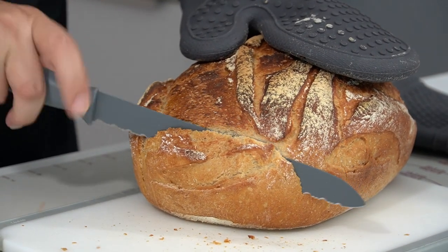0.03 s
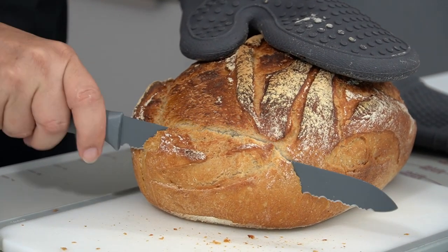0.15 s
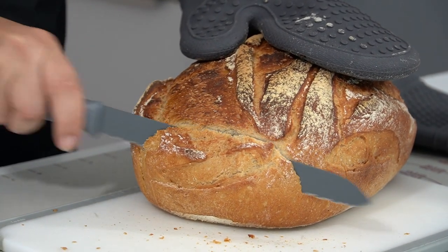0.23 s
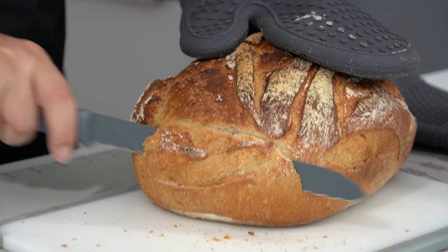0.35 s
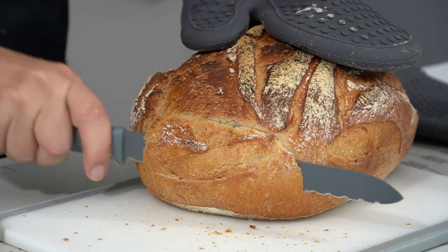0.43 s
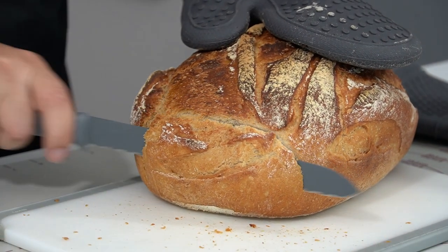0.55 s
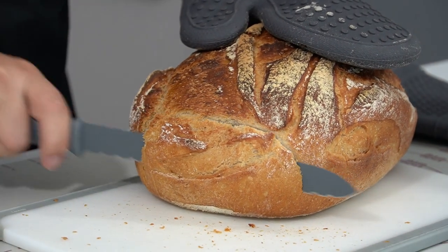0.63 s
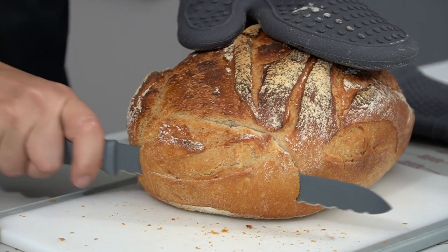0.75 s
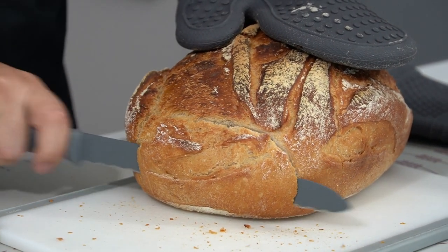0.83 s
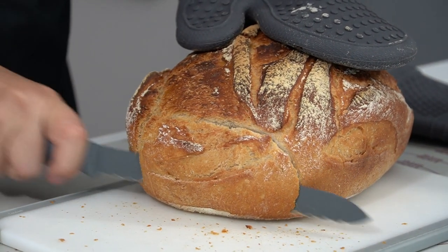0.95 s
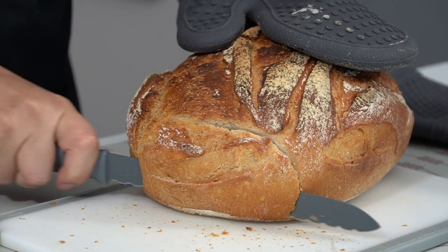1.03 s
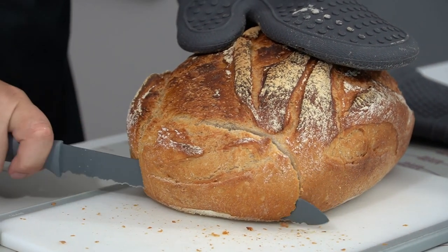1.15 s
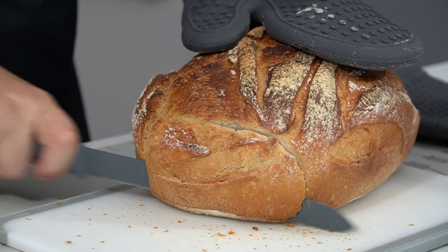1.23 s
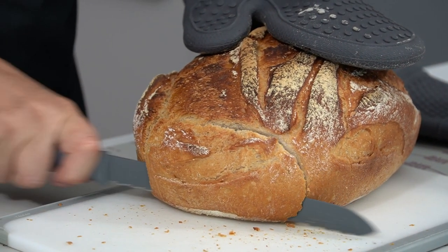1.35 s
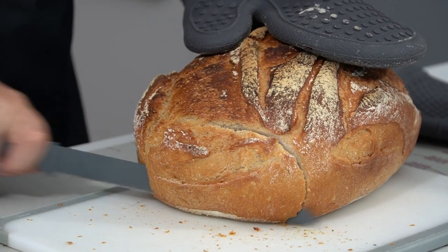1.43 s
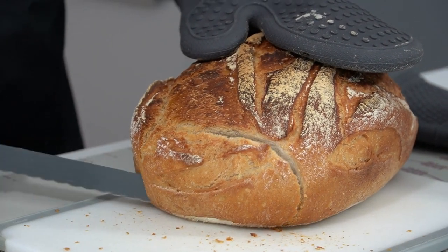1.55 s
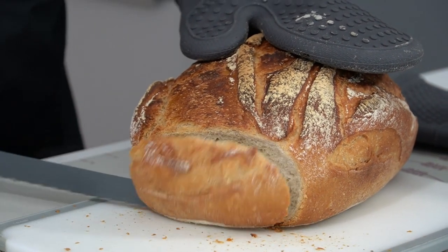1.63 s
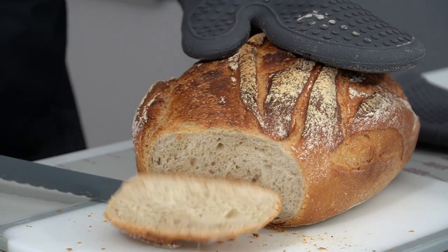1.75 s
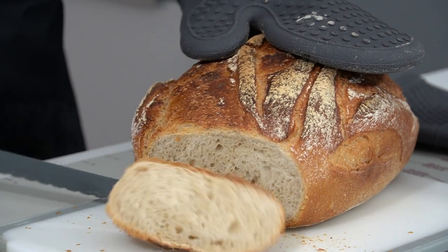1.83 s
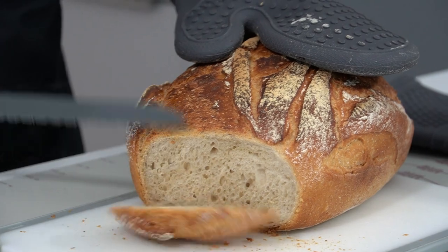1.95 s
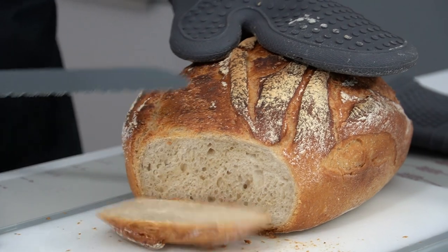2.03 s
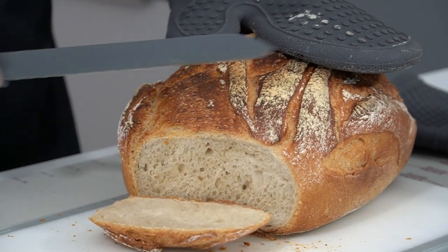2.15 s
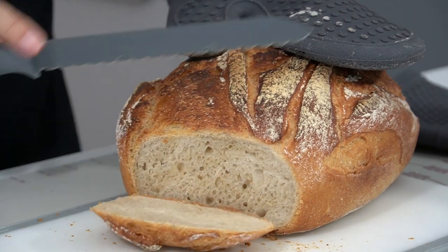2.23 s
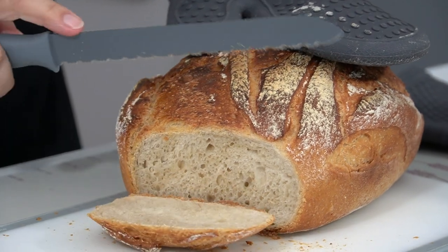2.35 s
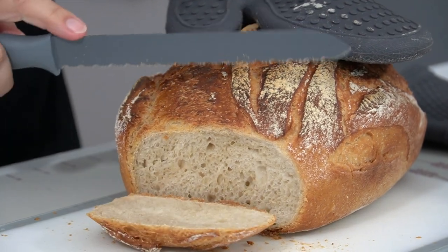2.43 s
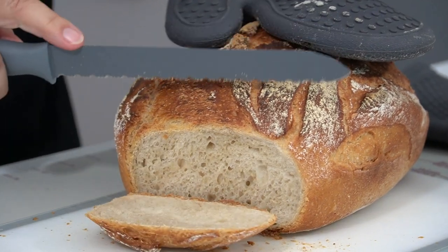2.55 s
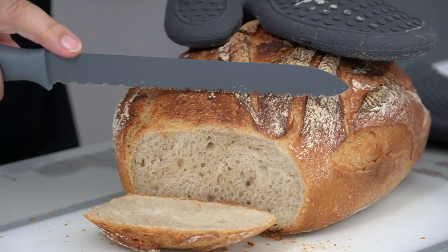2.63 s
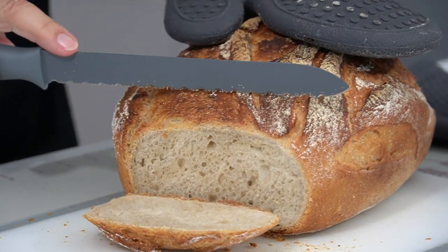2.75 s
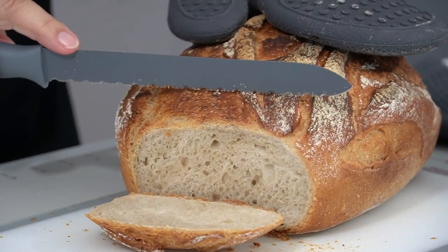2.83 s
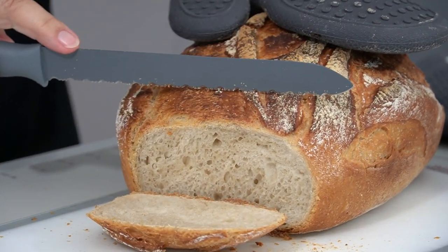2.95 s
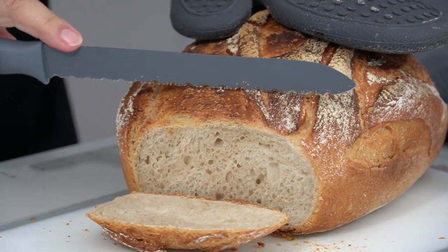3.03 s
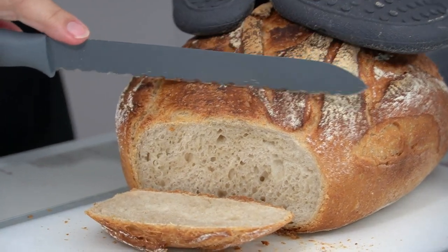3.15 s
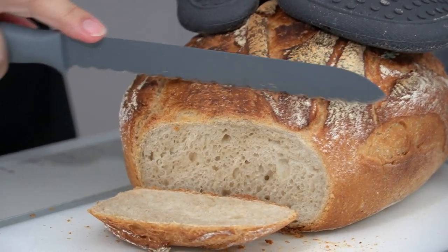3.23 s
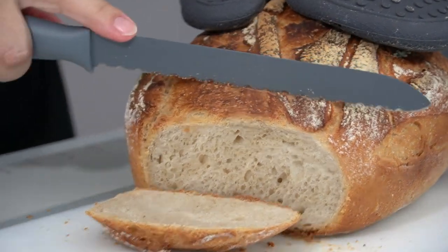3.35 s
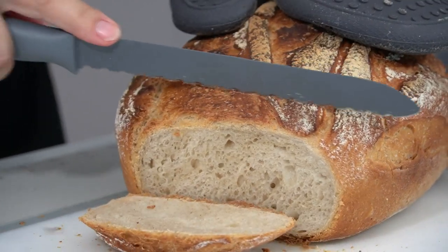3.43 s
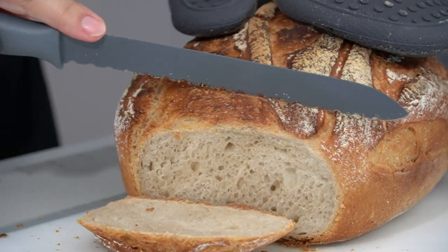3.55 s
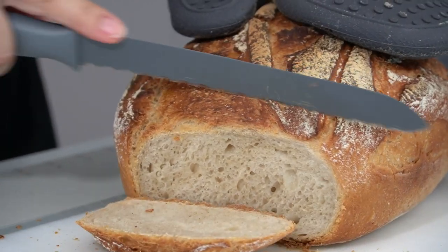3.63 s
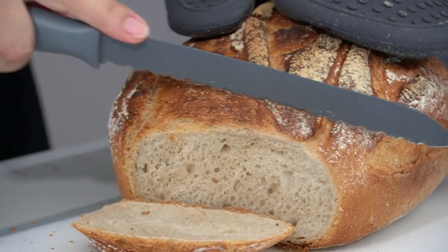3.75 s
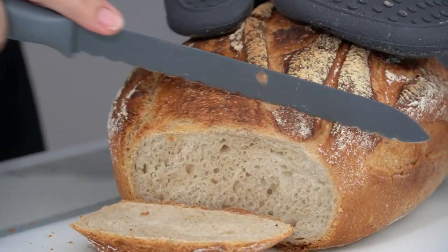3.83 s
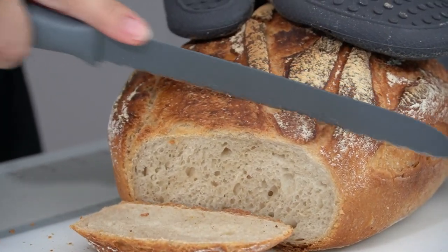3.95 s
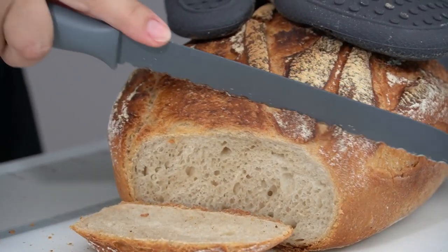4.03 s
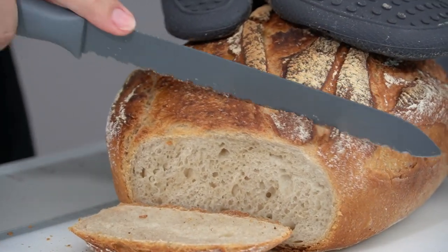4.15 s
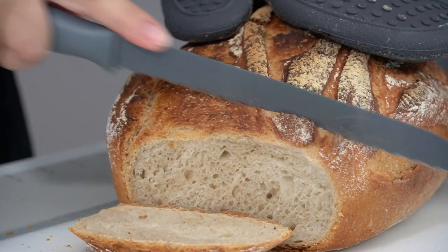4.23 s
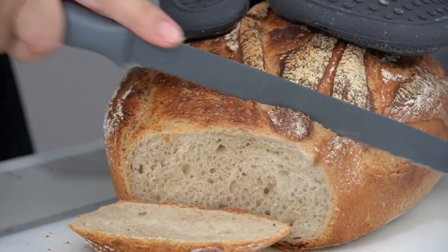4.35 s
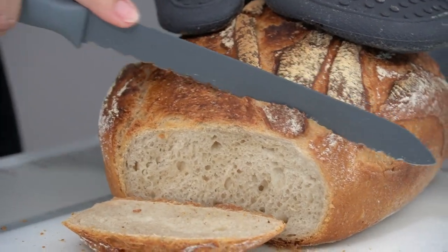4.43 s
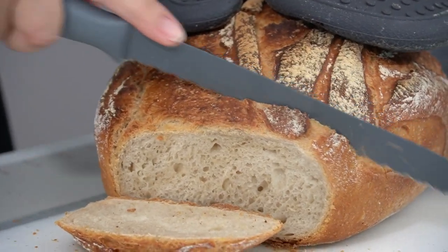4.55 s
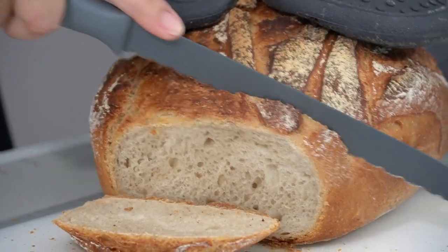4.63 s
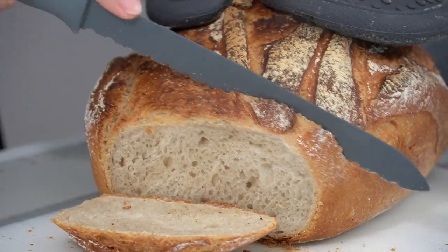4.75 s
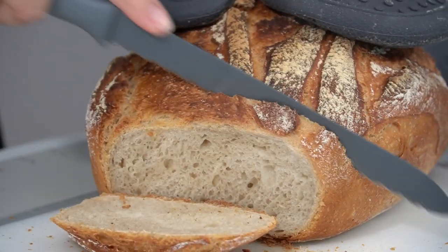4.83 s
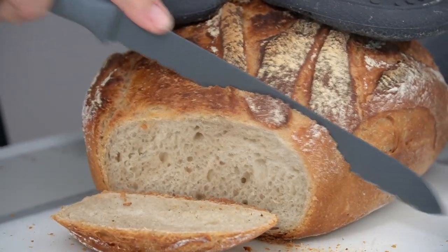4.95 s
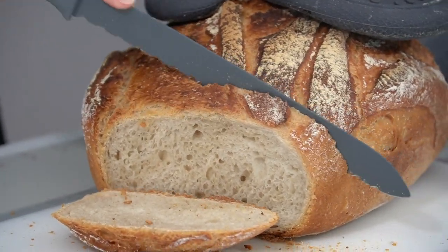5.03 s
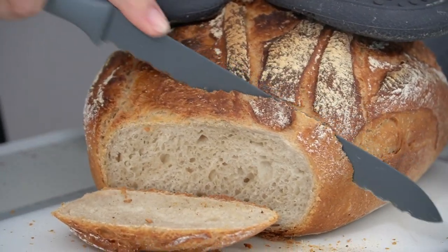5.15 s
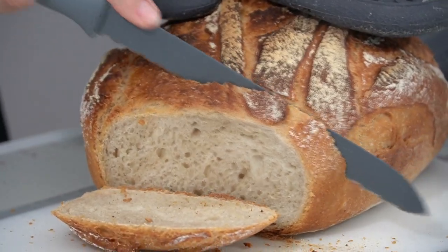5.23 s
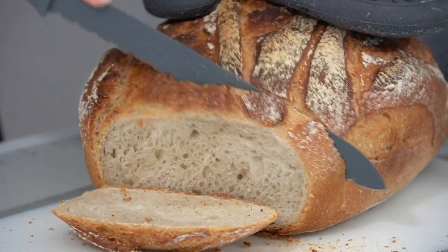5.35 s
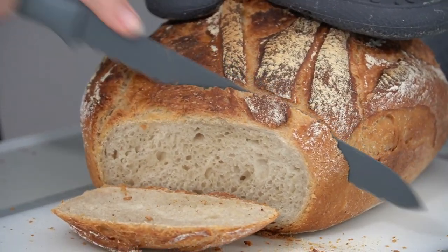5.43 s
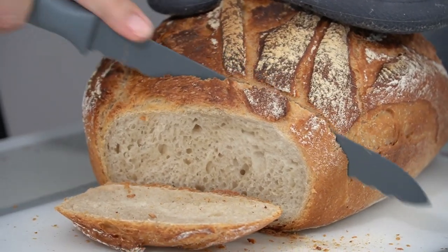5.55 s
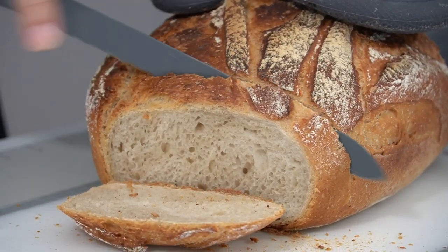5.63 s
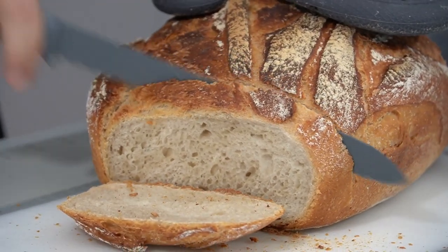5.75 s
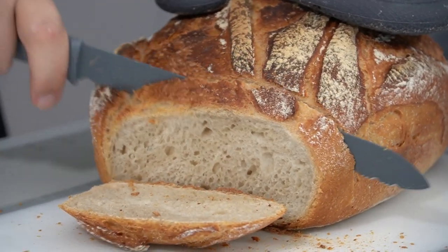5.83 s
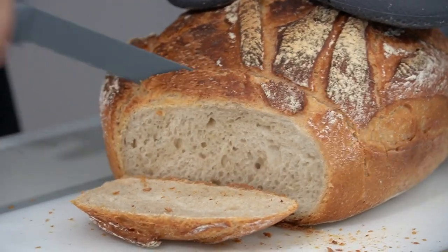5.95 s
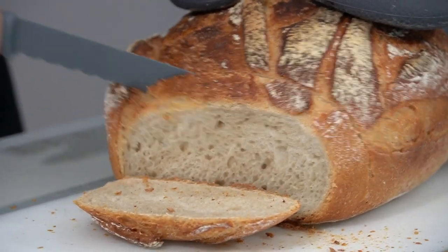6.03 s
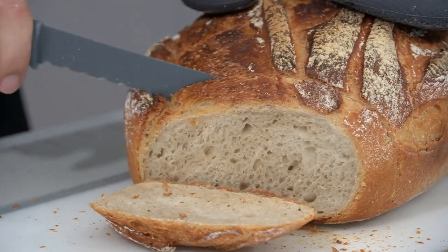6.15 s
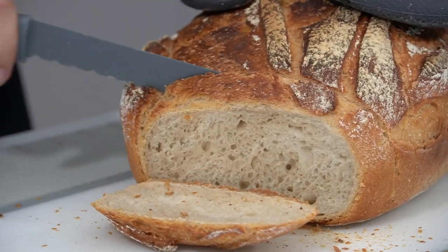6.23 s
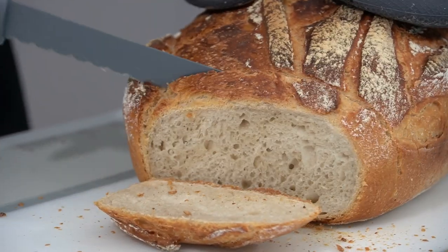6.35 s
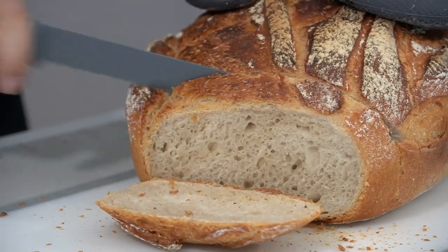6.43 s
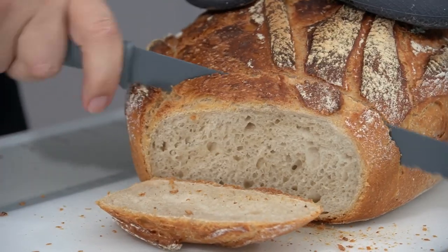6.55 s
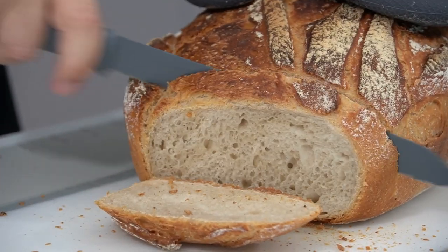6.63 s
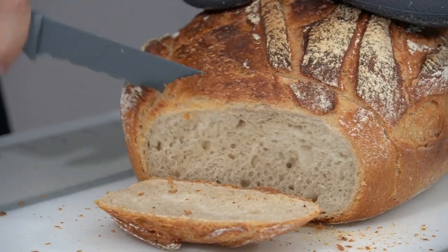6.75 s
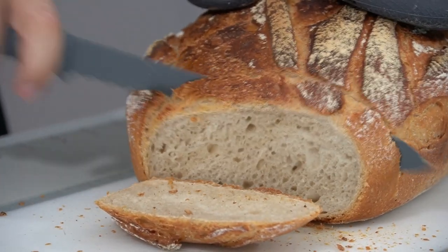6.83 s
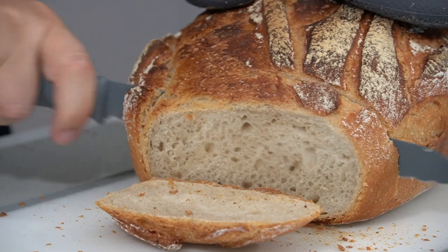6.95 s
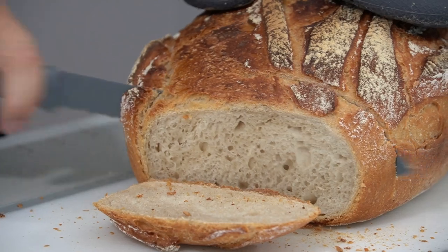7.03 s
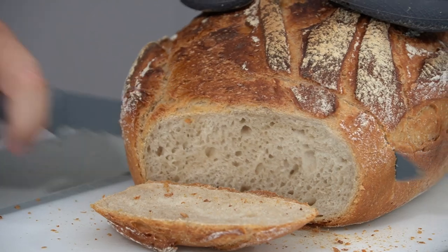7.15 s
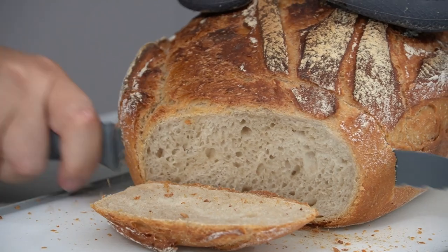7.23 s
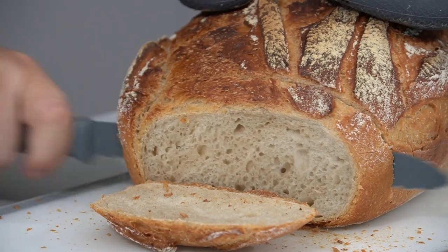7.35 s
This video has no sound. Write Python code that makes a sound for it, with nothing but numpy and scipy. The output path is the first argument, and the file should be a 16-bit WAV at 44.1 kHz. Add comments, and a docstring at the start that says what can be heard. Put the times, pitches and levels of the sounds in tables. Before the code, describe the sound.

Crisp crust crackles and snaps under quick back-and-forth knife strokes, a slice thuds onto a board, and after a pause sawing resumes with short groans.

```python
"""A serrated knife saws through a hot crusty loaf on a board: many tiny fractures crack, sparkle and thump the loaf.
Larger snaps are single cracks with a push on the loaf; on moist crumb or hard crust the blade sticks and slips.
One slice peels off, falls and rocks with dull thuds made by impulses into a board spectrum; then a second cut begins.
A hard-walled kitchen answers with early echoes and a decaying noise tail, over a steady low rush of shaped noise."""
import sys
import numpy as np
from scipy import signal
from scipy.fft import rfft, irfft, next_fast_len
from scipy.io import wavfile
from scipy.ndimage import uniform_filter1d

SR = 44100
rng = np.random.default_rng(int(sys.argv[2]) if len(sys.argv) > 2 else 0)


def master(y):
    """Save y as 16-bit WAV."""
    cut = np.clip(np.atleast_2d(y).T, -1, 1)
    pcm = np.round(cut * 32767)  # scale
    wavfile.write(sys.argv[1], SR, pcm.astype(np.int16))


N = 325899

# How hollow and how uneven the crackle is along the two cuts. Each row: time in seconds,
# loaf body in dB re crackle, scatter of fracture sizes in dB.
CRACKLE_ALONG_CUT = [(0.1, 1.5, 3), (0.8, -3.5, 3), (1.3, 0, 1.5), (1.55, 3, -1), (3.3, 2.5, 9.5),
                     (4.2, 7.5, 0), (4.7, 2, 2), (5.55, 5.5, 4.5), (5.88, 5, 3), (6.15, -1, 6.5),
                     (6.92, 8.5, 4.5), (7.3, 5.5, 7.5)]
# Spectra of the hollow loaf, the cracking crust and its crisp flakes.
# Each row: frequency in Hz, relative level in dB.
LOAF_BODY_SPECTRUM = [(30, -26), (60, -18.5), (100, -7.5), (160, 0), (220, -1), (400, -0.5), (550, -3),
                      (700, -6), (1000, -28.5), (2500, -41)]
CRACK_SPECTRUM = [(200, -39), (500, -2), (750, 2.5), (1000, 0), (1500, 1.5), (1950, -2.5), (2500, -0.5),
                  (3200, -14.5), (5000, -26), (12000, -56)]
CRISP_SPECTRUM = [(1000, -20.5), (2400, -5), (3400, 1.5), (4700, -1.5), (6300, -6.5), (8500, -10.5),
                  (10500, -17), (16000, -29)]


def sawing():
    """Brittle fracture in clumps: cracks, sparkles and thumps are largest just after each uneven tooth catch."""
    crack_gain, crisp_gain = crumbling()
    cut_s, body_db, coarse_db = np.transpose(CRACKLE_ALONG_CUT)
    body_gain = crack_gain * amp(np.interp(np.arange(N) / SR, cut_s, body_db))

    times = np.sort(rng.uniform(0, N / SR, size=16000))
    at = (times * SR).astype(int)
    teeth_per_s = 58 * np.exp(.45 * wobble(45))
    teeth = np.cumsum(teeth_per_s) / SR
    since_catch = teeth[at] % 1  # fraction of the way to the next catch

    clumping, hard_spots = 1.4, .55  # in units of the size scatter
    thump_scatter_db, sparkle_scatter_db = 4, 2.5
    scatter_db = np.interp(times, cut_s, coarse_db)
    luck = np.minimum(rng.standard_normal((3, len(times))), 2)
    sizes = amp(scatter_db * (luck[0] - clumping * since_catch + hard_spots * wobble(60)[at]))
    thumps = sizes * amp(thump_scatter_db * luck[1]) * rng.choice([-1, 1], len(times))
    sparkles = sizes * amp(sparkle_scatter_db * luck[2])

    span = .05  # s, over which the mean power is held
    thump_train = even(pushes(times, thumps), span)
    crack_train = even(bursts(times, sizes, life=0.00046, size=64), span)
    sparkle_train = even(bursts(times, sparkles, life=0.00078, size=48), span)
    loaf = ring(body_gain * thump_train, LOAF_BODY_SPECTRUM)
    crust = ring(crack_gain * crack_train, CRACK_SPECTRUM)
    flakes = ring(crisp_gain * sparkle_train, CRISP_SPECTRUM)
    crackle = wandering_colour(amp(-0.32) * crust + amp(-0.43) * flakes, depth_db=2.48)
    return amp(-1.5) * loaf + crackle


# Between strokes the wedged blade keeps the crust crackling faintly.
# Each row: start in seconds, end in seconds, relative level in dB.
WEDGED_BLADE = [(0.12, 0.69, -55), (3.24, 7.4, -55)]
HARDEST_SHARE = 0.57  # how far into a stroke the hand bears down most
# The slice peels off, crumbling ever less.
PEEL_S, PEEL_DB, PEEL_FADE_DB_PER_S, PEEL_CRISP_DB = 1.72, -43.5, 46, -5


def crumbling():
    """Crackle loudness follows force: crackle and crisp gains from strokes, peeling slice and wedged blade."""
    crack, crisp = 0, 0
    for start, length, db, crisp_db in strokes():
        hardest = start + HARDEST_SHARE * length
        shape = swell(start, hardest, start + length, bite_db=-3, ease_db=-6.5, rise=0.023, release=0.025)
        force = amp(db) * shape
        crack = crack + force
        crisp = crisp + force * amp(crisp_db)
    t = np.arange(N) / SR
    peel = (t > PEEL_S) * amp(PEEL_DB - PEEL_FADE_DB_PER_S * np.abs(t - PEEL_S))
    wedged = sum(amp(db) * ((t > start) & (t < end)) for start, end, db in WEDGED_BLADE)
    wedged_crisp_db = -2.5
    # the wedged crackle adds in power
    crack_gain = np.hypot(per_sample(crack) + peel, wedged)
    crisp_gain = np.hypot(per_sample(crisp) + peel * amp(PEEL_CRISP_DB), wedged * amp(wedged_crisp_db))
    return crack_gain, crisp_gain


# A saw cycle is a light draw and a hard push. Each row: draw start in seconds, draw relative level in dB,
# push start in seconds, push length in seconds, push relative level in dB, push crispness in dB re crackle.
SAW_CYCLES = [(0.0, -47.5, 0.155, 0.084, -40.5, -1.5), (0.287, -49.5, 0.41, 0.14, -38, -2.5),
              (0.597, -44.5, 0.728, 0.11, -37.5, -5.5), (0.869, -43.5, 1.015, 0.087, -38.5, -3),
              (1.153, -40.5, 1.305, 0.073, -38, -3.5), (1.441, -42.5, 1.47, 0.14, -36.5, -2.5),
              (1.608, -42, 1.684, 0.022, -31.5, -3.5), (3.23, -44, 3.275, 0.121, -32.5, -4),
              (3.521, -44, 3.681, 0.11, -33.5, -3.5), (3.856, -40, 3.99, 0.097, -37, -0.5),
              (4.144, -42.5, 4.286, 0.093, -33.5, -3), (4.437, -35.5, 4.575, 0.1, -34, -7),
              (4.742, -38.5, 4.87, 0.1, -38, -4.5), (5.031, -42, 5.187, 0.066, -37.5, -3),
              (5.323, -46.5, 5.487, 0.085, -30, -6), (5.654, -47, 5.8, 0.1, -32, -5.5),
              (6.052, -46, 6.145, 0.1, -43, -2.5), (6.323, -44, 6.5, 0.11, -41.5, -9),
              (6.725, -39.5, 6.9, 0.096, -32.5, -1), (7.01, -51, 7.198, 0.137, -34.5, -1.5)]
DRAW_S, DRAW_CRISP_DB = 0.087, -1.5  # length of every draw, and its crispness re the push


def strokes():
    """Reciprocating motion: every draw and push as (start s, length s, crackle dB, crispness dB)."""
    draws = [(s, DRAW_S, db, crisp_db + DRAW_CRISP_DB) for s, db, _, _, _, crisp_db in SAW_CYCLES]
    return draws + [cycle[2:] for cycle in SAW_CYCLES]


def wandering_colour(x, depth_db):
    """Local resonance: each spot of crust rings a little differently, so the colour shifts along the cut."""
    z = signal.stft(x, nperseg=512)[2]
    across_hz = uniform_filter1d(rng.standard_normal(z.shape), size=5, axis=0)
    field = uniform_filter1d(across_hz, size=14, axis=1)
    return signal.istft(z * amp(depth_db * unit(field)), nperseg=512)[1][:N]


# The largest pieces of crust snap. Each row: time in seconds, relative crack level in dB,
# loaf body in dB re crack before mixing, crispness in dB re crack.
CRUST_SNAPS = [(0.749, -28, -5, 3.5), (0.893, -33.5, -5, -5), (1.308, -33, -13, 0), (1.337, -32, -7, -28),
               (1.68, -21, -2, -12), (1.699, -32, 10, -3), (3.238, -27.5, -2, -8.5), (3.269, -22, 3.5, -16),
               (3.366, -28, 1, -15), (3.386, -26, 5.5, 2), (3.683, -25, 1, -12), (3.865, -33, 5, 6),
               (4.802, -33, 0, -3), (4.939, -29.5, 3, -4), (5.192, -27.5, -14, -4.5), (5.225, -29, 2, -6),
               (5.336, -33, 2, -4.5), (5.54, -29, -3, -7), (5.853, -21.5, 7, 0.5), (5.882, -24, 7.5, 3),
               (6.103, -44, 3, -18), (6.142, -29, -17, -3.5), (6.464, -37, 4, -7), (6.526, -29, 11, -22),
               (6.753, -24, -1, -26), (6.888, -28, 10, -13), (6.918, -22, 14, -0.5)]


def snapping():
    """Sudden release of strain: a large fracture gives one sharp crack and one push on the loaf."""
    s, db, body_db, crisp_db = np.transpose(list(CRUST_SNAPS) + chips())
    crust = ring(bursts(s, amp(db), life=0.0012, size=300), CRACK_SPECTRUM)
    flakes = ring(bursts(s, amp(db + crisp_db), life=0.0044, size=300), CRISP_SPECTRUM)
    loaf = ring(pushes(s, -amp(db + body_db)), LOAF_BODY_SPECTRUM)
    return amp(21.0) * crust + amp(21.0) * flakes + amp(19.0) * loaf


BITE_DB = -1  # the snap with which each push bites, re its crackle, before mixing
CHIPS_PER_S, CHIP_DB, CHIP_SCATTER_DB = 14, 4.5, 1.5  # random chips under a push; level likewise
# loaf body and crispness of bites and chips re crack, and the scatter of both among the chips
CHIP_BODY_DB, CHIP_CRISP_DB, CHIP_COLOUR_DB = -1.7, -8.5, 4.5


def chips(size=4):
    """Random fracture under load: rows like the snaps, one as each push bites and more while it lasts."""
    rows = []
    for _, _, start, length, db, _ in SAW_CYCLES:
        rows.append((start + .002, db + BITE_DB, CHIP_BODY_DB, CHIP_CRISP_DB))
        draws = rng.random((size, 2))
        scatter = rng.standard_normal((size, 3))
        for (place, chance), (loud, dull, bright) in zip(draws, scatter):
            if chance < CHIPS_PER_S * length / size:
                rows.append((start + place * length, db + CHIP_DB + CHIP_SCATTER_DB * loud,
                             CHIP_BODY_DB + CHIP_COLOUR_DB * dull, CHIP_CRISP_DB + CHIP_COLOUR_DB * bright))
    return rows


# The side of the blade drags on moist crumb, and the teeth skid over hard crust.
# Each row: start in seconds, hardest point in seconds, end in seconds, relative level in dB.
# An end before the hardest point makes the sound stop at that point.
CRUMB_DRAGS = [(1.49, 1.54, 1.61, -36), (1.685, 1.7, 1.72, -27.5), (6.36, 6.37, 6.07, -27),
               (6.464, 6.478, 6.5, -29), (6.506, 6.53, 6.635, -20), (6.7, 6.79, 6.825, -27.5),
               (6.9, 6.92, 6.87, -19.5)]
CRUST_SKIDS = [(3.54, 3.56, 3.585, -39.5), (3.865, 3.881, 3.905, -30.5)]
# Spectra of the two. Each row: frequency in Hz, relative level in dB.
CRUMB_SPECTRUM = [(40, -66), (100, -20), (170, -5), (235, -1.5), (350, -6.5), (470, -3), (630, -2.5),
                  (780, -9.5), (1150, -10.5), (1500, -24.5), (4000, -31), (8000, -50.5)]
SKID_SPECTRUM = [(1500, -20), (2500, -5), (3000, -5), (3500, -0.5), (3800, -2), (4200, -3), (5200, -19),
                 (6100, -14), (7000, -17), (8200, -17), (11000, -28)]


def dragging():
    """Friction-driven vibration: moist crumb makes the loaf groan, hard crust gives a bright zip."""
    groan = stick_slip(CRUMB_DRAGS, 330, CRUMB_SPECTRUM)
    zip_sound = stick_slip(CRUST_SKIDS, 260, SKID_SPECTRUM)
    return amp(-1.5) * groan + zip_sound


def stick_slip(rubs, rate, spectrum):
    """Stick-slip: the blade lets go at an uneven rate (about rate slips/s), and every slip rings the spectrum."""
    grip = sum(amp(db) * swell(start, hardest, end, bite_db=0, ease_db=-5.0, rise=0.0013, release=0.018)
               for start, hardest, end, db in rubs)
    phase = np.cumsum(rate * np.exp(.6 * wobble(300))) / SR
    slips = np.diff(np.floor(phase), prepend=0)
    slip_scatter_db = 3
    judder = slips * amp(slip_scatter_db * wobble(400)) * rng.choice([-1, 1], N)
    return ring(per_sample(grip) * even(judder, span=0.039), spectrum)


# Resonances of the loaf with the blade at three depths.
# Each row: frequency in Hz, width in Hz, lift in dB.
MODES_NEAR_BOARD = [(187, 160, -5), (267, 47, 5), (350, 76, -2), (515, 140, 3), (630, 67, 4.5),
                    (1250, 130, 1.5), (2220, 230, -1.5), (2790, 300, 5), (4070, 700, 1.5),
                    (13500, 7800, 1.5)]
MODES_IN_TOP_CRUST = [(84.5, 32, 3), (126, 33, 0), (245, 43, 2), (430, 200, 2.5), (770, 110, -1.5),
                      (1000, 300, 0), (1640, 190, 3), (2290, 90, -1), (8800, 4900, 3), (13200, 1300, 5.5)]
MODES_MID_LOAF = [(100, 170, -2), (271, 38, 7.5), (370, 76, 1), (470, 59, 3.5), (638, 41, 7.5),
                  (703, 43, -3), (890, 35, 1), (1680, 450, -0.5), (2360, 290, 2), (2920, 310, -4),
                  (6470, 5500, 3.5), (12800, 3800, 2)]


def loaf_colour(x):
    """Modal resonance: near the board in the first cut, then in the top crust, then in mid-loaf."""
    second_cut, sunk = int(3 * SR), int(6.3 * SR)
    stage = np.searchsorted([second_cut, sunk], np.arange(N))
    flat = [(1, 0)]
    depths = [MODES_NEAR_BOARD, MODES_IN_TOP_CRUST, MODES_MID_LOAF]
    return sum(ring(x * (stage == k), flat, modes) for k, modes in enumerate(depths))


# Soft knocks of slice, loaf and hand on the board.
# Each row: time in seconds, relative thud level in dB, crust crunch in dB re thud before mixing.
BOARD_KNOCKS = [(1.8261, -8, -8), (1.83, -17, -6), (1.961, -10, -13), (2.04, -21, -9), (2.050, -19, -11),
                (2.092, -23, -31), (2.139, -24.5, -3), (2.239, -20.5, -41), (2.281, -30, -34),
                (2.708, -22, -10), (2.927, -31.5, -8.5)]
# Spectrum of the board. Each row: frequency in Hz, relative level in dB.
BOARD_SPECTRUM = [(40, -35), (90, -14), (140, 0.5), (240, 4.5), (400, 1.5), (700, -7), (1200, -28),
                  (3000, -53)]


def knocking():
    """Impact excitation: the slice topples and rocks with dull thuds, and its crust crunches on the board."""
    s, db, edge_db = np.transpose(BOARD_KNOCKS)
    thud = ring(pushes(s, amp(db + 9.5)), BOARD_SPECTRUM)
    crunch = bursts(s, amp(db + edge_db + 14.0), life=0.0045, size=800)
    return thud + ring(crunch, CRACK_SPECTRUM) + amp(-8.5) * ring(crunch, CRISP_SPECTRUM)


# Reverberation of the kitchen. Each row: frequency in Hz, time to decay by 60 dB in seconds.
KITCHEN_T60 = [(100, 0.3), (300, 0.96), (1000, 0.83), (3000, 1), (6000, 0.69), (14000, 0.12)]
# Strength of the diffuse tail. Each row: frequency in Hz, relative level in dB.
KITCHEN_TAIL_DB = [(100, -15), (300, -12.5), (1000, -5.5), (3000, -8.5), (7000, -8.5), (14000, -11)]


def kitchen(x):
    """Reverberation: early echoes of worktop and near walls, and a diffuse tail decaying at its own speed per band."""
    hz, t, z = signal.stft(rng.standard_normal(SR), SR, nperseg=256)
    decay = amp(-60 * t / along(KITCHEN_T60, hz)[:, None])
    decay /= np.sqrt(np.mean(decay ** 2, axis=1, keepdims=True) * SR)
    strength = amp(along(KITCHEN_TAIL_DB, hz))[:, None]
    tail = signal.istft(z * decay * strength, SR, nperseg=256)[1]
    response = np.concatenate([np.zeros(int(.008 * SR)), tail])
    walls = (rng.uniform(.002, .025, size=8) * SR).astype(int)
    response[walls] += amp(-20.5) * rng.choice([-1, 1], len(walls))
    return signal.fftconvolve(x, response)[:N]


# Spectrum of the quiet room. Each row: frequency in Hz, relative level in dB.
AIR_SPECTRUM = [(12, -17), (20, -9), (38, 0.5), (74, -5.5), (107, 0), (172, -3.5), (248, -3), (2820, -17.5),
                (3950, -19), (10500, -25), (16000, -29)]


def room_tone():
    """Stationary random noise: the steady low rush of a quiet kitchen."""
    rush = filtered(rng.standard_normal(N), lambda hz: amp(along(AIR_SPECTRUM, hz)))
    return amp(-51.5) * unit(rush)


def swell(start, hardest, end, bite_db, ease_db, rise, release):
    """Force envelope of one stroke, every 32 samples: it bites, grows to its hardest point, eases and lets go."""
    t = np.arange(0, N, 32) / SR
    knots = np.maximum.accumulate([start - rise, start, hardest, end, end + release])
    return amp(np.interp(t, knots, [-30, bite_db, 2, ease_db, -30], left=-120, right=-120))


def pushes(times, sizes):
    """Impulsive force: a single sample at each time."""
    return np.bincount(np.round(np.abs(times) * SR).astype(int), sizes, N)[:N]


def bursts(times, sizes, life, size=128):
    """Damped fracture: each is a tiny noise burst with its own colour, decaying over life seconds."""
    step = np.arange(size)
    shapes = rng.standard_normal((len(times), size)) * np.exp(-step / SR / life)
    shapes *= (sizes / np.linalg.norm(shapes, axis=1))[:, None]
    at = np.round(np.abs(times) * SR).astype(int)[:, None] + step
    return np.bincount(at.ravel(), shapes.ravel(), N)[:N]


def ring(x, spectrum, resonances=(), size=8192):
    """Minimum-phase resonance: a causal response of energy 1, its spectrum lifted at the resonances."""
    hz = np.fft.rfftfreq(size, 1 / SR)
    lifts = sum(lift / (1 + (2 * (hz - f) / width) ** 2) for f, width, lift in resonances)
    cepstrum = irfft(np.log(amp(along(spectrum, hz) + lifts)))
    # folding the cepstrum onto positive time makes the response causal
    cepstrum[1:size // 2] *= 2
    cepstrum[size // 2 + 1:] = 0
    response = irfft(np.exp(rfft(cepstrum)))
    return signal.oaconvolve(x, response / np.linalg.norm(response))[:N]


def filtered(x, response):
    """Linear filtering: x times a response of frequency."""
    m = next_fast_len(N + SR // 2)
    return irfft(rfft(x, m) * response(np.fft.rfftfreq(m, 1 / SR)), m)[:N]


def even(x, span):
    """Power normalisation: hold the mean power near 1 over span seconds, keeping the fine spikes."""
    power = np.abs(uniform_filter1d(x ** 2, max(int(span * SR), 1)))
    return x / np.sqrt(power + 1e-9)


def wobble(rate):
    """Random modulation: a curve through rate random knots a second."""
    return per_sample(rng.standard_normal(int(N * rate / SR) + 2))


def per_sample(control):
    """Linear interpolation: stretch a slow control over the whole length."""
    return np.interp(np.arange(N), np.linspace(0, N, len(control)), control)


def along(points, hz):
    """Logarithmic frequency scale: interpolate (Hz, value) points."""
    f, v = np.transpose(points)
    return np.interp(np.log(hz + 1), np.log(f + 1), v)


def amp(db):
    """Decibel law: dB to amplitude gain."""
    return 10 ** (np.asarray(db) / 20)


def unit(x):
    """Root-mean-square level: scale to rms 1."""
    return x / np.sqrt(np.mean(x ** 2) + 1e-20)


def scene():
    """Superposition: knife, loaf and board, their reverberation, and the room tone."""
    bread = loaf_colour(sawing() + snapping() + dragging()) + knocking()
    return (bread + kitchen(bread) + room_tone())[None]


TOP_HZ = 16000


def record(dry):
    """Band limiting: nothing remains from TOP_HZ upwards."""
    return np.array([filtered(channel, lambda hz: hz < TOP_HZ) for channel in dry])


dry = scene()
out = record(dry)
master(out)
```